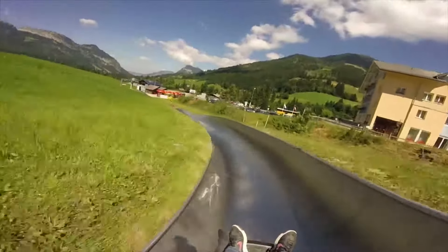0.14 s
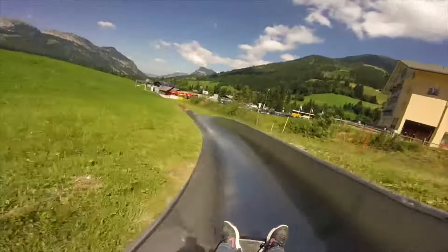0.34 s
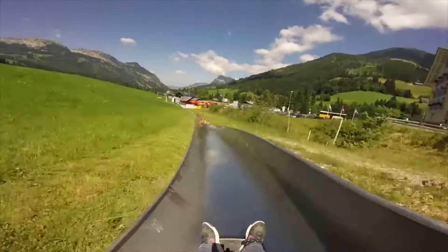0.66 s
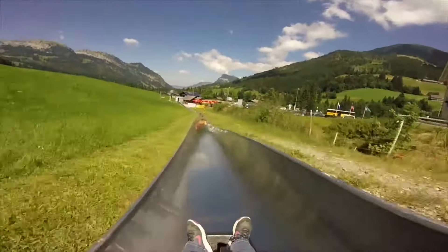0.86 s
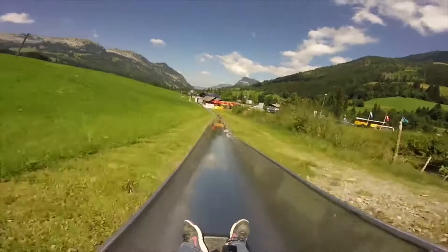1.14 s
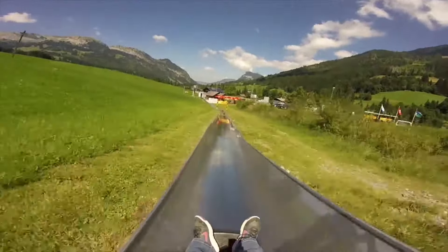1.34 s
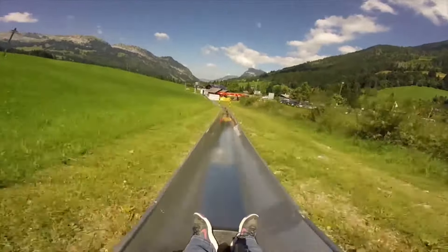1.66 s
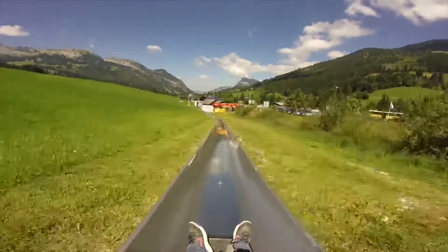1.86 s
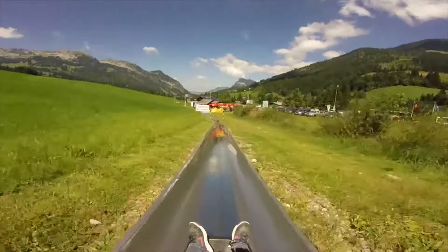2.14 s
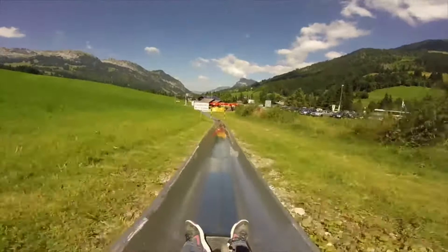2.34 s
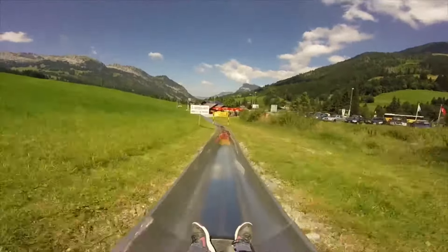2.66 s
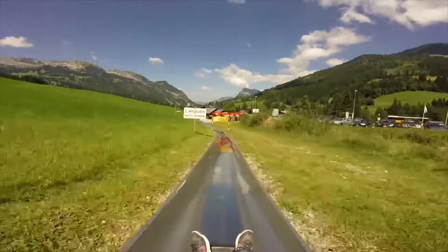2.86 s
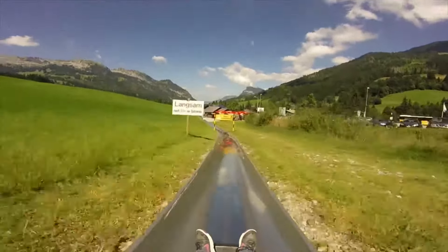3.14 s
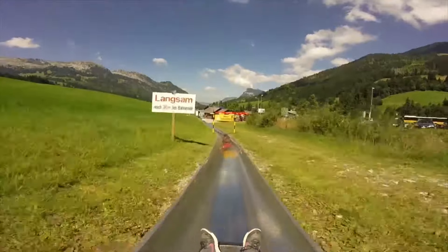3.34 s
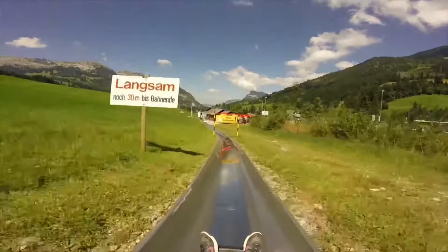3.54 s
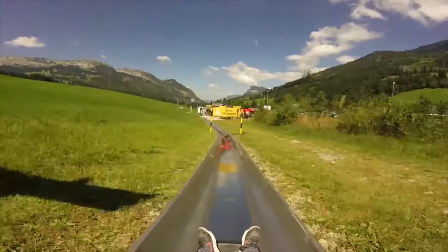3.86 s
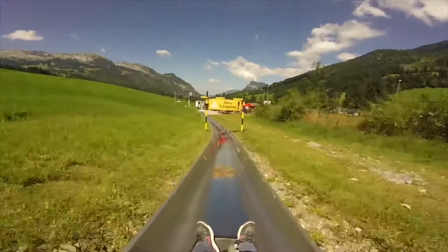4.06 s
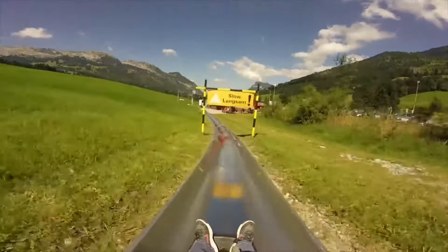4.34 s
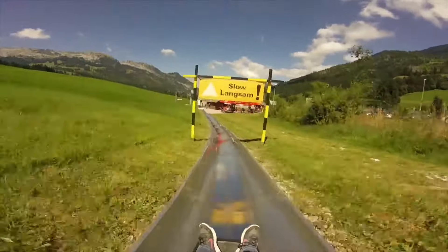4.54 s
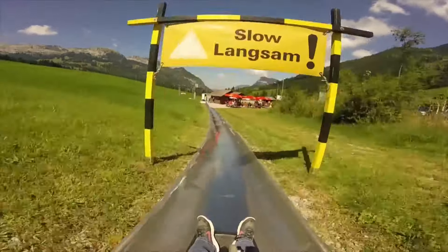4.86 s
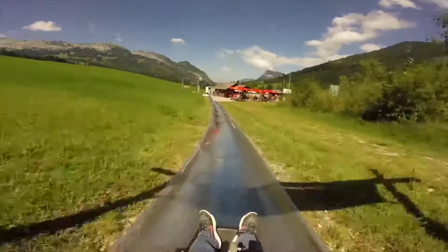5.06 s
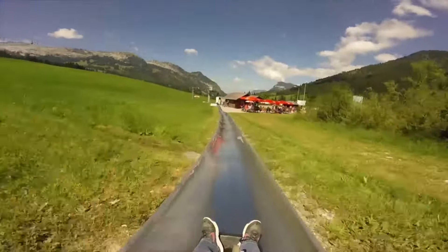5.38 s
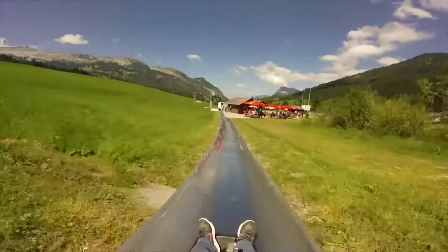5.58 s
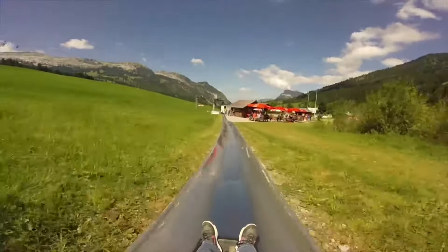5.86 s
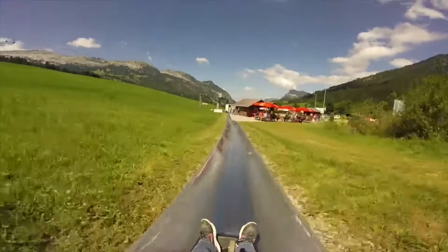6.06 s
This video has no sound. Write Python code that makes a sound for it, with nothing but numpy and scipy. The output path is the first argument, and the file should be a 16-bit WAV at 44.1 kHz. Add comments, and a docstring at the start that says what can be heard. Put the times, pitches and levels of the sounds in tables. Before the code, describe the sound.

A close, dry, mono ride on a wheeled sled in a steel trough outdoors. Low rough rumble, boomy buffeting and a thin grainy hiss run throughout, swelling with each shake. From 0 to 1.3 s knocks come thick and uneven, around 200 to 600 Hz, with jingling rattles, bright clinks, scrapes and a loose rod pinging near 2.5 kHz. A sharp, high clink marks 1.5 s; strong case thumps follow at 1.8 to 1.95 s. A hard knock lands at 2.2 s, then heavy ones at 2.5, 2.6 and 2.85 s while the trough flares in hollow rings until about 3.5 s. The bed then thins. Distinct jolts with short rattles and scrapes hit near 3.8, 4.15, 4.45, 4.8, 5.1 and 5.5 s. Faint chirps return from 4.3 s, clustering after a knock at 5.87 s, as rolling continues to the cut.

```python
"""Sled ride down a steel trough

On board a wheeled sled, with a cased microphone on the rider, close to wheels, frame and seat.
Shaped noise and sparse impacts make wind and shaking thump low, the wheels rumble and the trough ring hollow.
Struck resonances make joints knock, loose metal rattle and one rod ping; gritty slips scrape, chirp and clink.
"""
import sys
import numpy as np
from scipy import signal
from scipy.fft import rfft, irfft
from scipy.io import wavfile
from scipy.ndimage import uniform_filter1d

SR = 44100
rng = np.random.default_rng(int(sys.argv[2]) if len(sys.argv) > 2 else 0)


def materialize(psi):
    """Save the field psi as 16-bit PCM at rate SR to the path in sys.argv[1].

    A 1-D psi becomes a single channel; in a 2-D psi each row is a channel.
    """
    bounded = np.clip(np.atleast_2d(psi).T, -1, 1)
    quanta = np.round(bounded * 32767).astype(np.int16)
    wavfile.write(sys.argv[1], SR, quanta)


N = 274169

# steady layers before shaking lifts them: time_s, buffeting_db, rumble_db, hiss_db, chatter_db, trough_db
RIDE_LEVELS = [(0.0, -31, -35, -57, -53.5, -79), (0.25, -33.5, -37, -49.5, -58, -62),
               (0.63, -34, -38, -55.5, -63.5, -62), (1.01, -33.5, -35, -52.5, -61.5, -65),
               (1.49, -30, -36, -50.5, -55.5, -59), (1.82, -29.5, -35.5, -50.5, -61, -60.5),
               (2.13, -30, -33.5, -50, -61.5, -55), (2.3, -32, -39, -53.5, -68, -61),
               (2.87, -37, -42.5, -57.5, -68, -61.5), (3.14, -32, -38.5, -56.5, -64, -61),
               (3.35, -34.5, -40.5, -54.5, -71, -63), (3.5, -44, -41.5, -58, -63, -59.5),
               (3.65, -37.5, -44.5, -60.5, -72.5, -66.5), (4.09, -35.5, -40.5, -59.5, -71.5, -67.5),
               (4.33, -35, -41, -58.5, -69, -64.5), (4.78, -31, -38.5, -60, -69, -64.5),
               (5.01, -33, -36, -54.5, -69.5, -64), (5.28, -38, -39.5, -61, -68, -67),
               (5.67, -33, -36, -51, -67, -61.5), (5.84, -32, -40, -57.5, -62.5, -62),
               (6.09, -39.5, -43, -57.5, -69.5, -64), (6.22, -31, -38.5, -57, -67, -68)]
# deepest sway of the case: time_s, level_db
SWAY_LEVELS = [(0.0, -43), (0.26, -31), (0.66, -42.5), (0.9, -34), (0.94, -46), (1.14, -40), (3.44, -43),
               (3.48, -52), (4.88, -40.5), (4.95, -59), (5.06, -26.5), (5.16, -53), (5.73, -32.5),
               (5.82, -62), (6.08, -32), (6.22, -39)]
# spectra, relative level in each hertz: frequency_hz, level_db
SWAY_SPECTRUM = [(10, -20), (24, 11.5), (40, 6), (55, -3.5), (90, -66.5), (220, -150)]
BUFFET_SPECTRUM = [(20, -38), (45, -2.5), (92, 2), (250, -7.5), (320, -18.5), (550, -120)]
RUMBLE_SPECTRUM = [(59, -21), (100, -13.5), (224, -3.5), (417, -7), (511, -8), (828, -24), (1110, -74),
                   (1300, -34), (1690, -83), (2860, -120)]
HISS_SPECTRUM = [(470, -6.5), (800, 0), (1110, -7.5), (1710, -17), (2120, -10.5), (2770, -17), (3250, -11),
                 (3940, -24), (5000, -27.5), (6500, -31), (11000, -120)]
METAL_SPECTRUM = [(880, 7), (1500, 8.5), (2060, 5), (2420, 1), (2770, -12), (3130, 0.5), (3580, 2),
                  (4340, 2.5), (5010, -1), (6550, 2), (8240, -6), (12600, -22), (14800, -33)]
# hollow modes of the trough: frequency_hz, width_hz of each of two passes, level_db
TROUGH_MODES = [(1520, 56, 6), (1784, 240, 1.5), (1624, 480, 15)]
# taps on a rod more or less free to ring: start_s, level_db (peak of the main ring, before its buzz), t60_s
ROD_TAPS = [(0.002, -55, 0.38), (0.119, -46, .1), (0.132, -42.5, 0.055), (0.3064, -44, 0.24),
            (0.54, -59, .2), (0.703, -54, 0.24), (1.014, -46, .15), (1.064, -47, 0.19), (1.125, -55, .1),
            (1.174, -47, .12), (1.2285, -51, .3), (1.244, -48, 0.48), (1.591, -50.5, 0.18),
            (1.62, -48, 0.1), (1.833, -52.5, 0.44), (2.177, -58, .15)]
# short modes of the rod: frequency_hz, width_hz, level_db (peak, relative to the main ring)
ROD_CLINK_MODES = [(2330, 120, -11), (2660, 120, -20), (2900, 100, -1), (4470, 220, -6)]
# slips, rms level before the envelope: start_s, level_db, pitch_hz
PART_CLINKS = [(0.0044, -45, 6920), (0.006, -47, 6300), (0.008, -53, 5530), (0.035, -49, 6700),
               (0.0373, -55, 6450), (0.039, -59, 5400), (0.069, -48, 4220), (0.092, -56, 4150),
               (0.13, -54, 4720), (0.132, -55, 5450), (0.192, -51, 4400), (0.25, -56, 4720),
               (0.3755, -53, 6760), (0.7547, -59, 6800), (0.9264, -52, 6820), (1.009, -52, 4970),
               (1.063, -49, 4580), (1.174, -51, 4700), (1.176, -58, 4350), (1.234, -51, 4070),
               (1.31, -60, 5340), (1.345, -52, 5400), (1.3994, -50, 6260), (1.51, -33, 6800),
               (1.773, -59, 6540), (1.835, -56, 4800), (2.16, -60, 6500), (2.178, -59, 6600),
               (2.355, -61, 6940), (2.4688, -60, 6600), (3.0765, -53, 8200), (5.1876, -56, 6560),
               (5.8383, -52, 7170)]  # small steel parts on one clear pitch
BEARING_CHIRPS = [(0.008, -52, 3130), (0.185, -60, 3400), (0.05, -58, 3680), (0.465, -62, 3900),
                  (0.625, -52.5, 2890), (0.915, -51, 3150), (1.02, -53, 3000), (1.068, -45, 3170),
                  (1.078, -55, 4300), (1.104, -61, 3630), (4.278, -59, 3010), (4.462, -56, 3250),
                  (4.658, -60, 3130), (4.918, -54, 3050), (4.935, -55, 3050), (5.047, -60, 3120),
                  (5.5273, -62, 2960), (5.5744, -68, 3050), (5.854, -49, 3070), (5.881, -50.5, 3200),
                  (5.9369, -58, 3300), (5.963, -64, 3350), (5.9966, -56, 3240), (6.02, -58, 3200),
                  (6.071, -58, 3100), (6.172, -54.5, 3170), (6.2, -64, 3250)]  # brief chirps, perhaps a wheel bearing
STEEL_SCRAPES = [(0.068, -43.5, 1290), (0.093, -55, 1700), (0.1193, -51, 2470), (0.176, -53, 1290),
                 (0.2389, -52, 1540), (0.3042, -53, 2450), (0.4206, -50, 1730), (0.616, -49, 1970),
                 (0.852, -44.5, 1030), (0.872, -63, 1710), (0.992, -48, 1740), (1.013, -52, 2120),
                 (1.0652, -50, 2540), (1.1706, -54, 2380), (1.3159, -48, 1420), (1.331, -59, 1630),
                 (1.345, -55, 1500), (1.503, -57, 1560), (1.9989, -49.5, 1520), (2.0277, -44.5, 1210),
                 (2.097, -49, 1200), (2.2824, -51, 1300), (2.332, -59, 2420), (2.372, -52, 1570),
                 (2.475, -55, 1530), (2.5192, -50, 1360), (2.8389, -42, 945), (3.091, -48.5, 1650),
                 (3.218, -50, 1600), (3.289, -52, 1490), (3.48, -52, 1230), (3.8152, -38.5, 1200),
                 (3.826, -52, 1740), (3.865, -61, 1780), (3.9124, -57, 2160), (4.133, -60, 1100),
                 (4.461, -47, 1190), (4.568, -53.5, 1380), (4.7895, -48, 1510), (4.791, -35, 900),
                 (4.808, -60, 1700), (4.8928, -55, 2220), (5.042, -55, 1240), (5.249, -56, 1450),
                 (5.5, -48, 1440), (5.5925, -59, 1380), (5.6292, -50, 1350)]  # a runner or brake part on the steel
TROUGH_FLARES = [(2.41, -65, 1620), (2.525, -51, 1800), (2.535, -48, 1570), (2.585, -54, 1590),
                 (2.645, -51, 1520), (2.68, -57, 1680), (2.858, -48, 1520), (2.895, -55.5, 1530),
                 (2.985, -55, 1600), (3.088, -53, 1780), (3.18, -55, 1620), (3.24, -50, 1520),
                 (3.33, -65, 1540), (3.5, -63, 1610)]  # the hollow ring of the trough flares up
# bursts of loose parts: start_s, level_db (rms before envelope and stutter), t60_s, tilt_db_per_octave
RATTLE_BURSTS = [(0.0346, -50.5, 0.027, 6), (0.065, -49, 0.035, -11), (0.0955, -62, 0.15, -11),
                 (0.126, -48.5, 0.048, 13), (0.176, -51, 0.24, 9), (0.252, -52, 0.04, 11),
                 (0.288, -50.5, 0.17, 2), (0.312, -53, 0.055, 9), (0.373, -54, 0.048, 11),
                 (0.4247, -46, 0.33, -6.5), (0.461, -54.5, 0.1, 2.5), (0.492, -61.5, 0.12, 9),
                 (0.556, -65, 0.035, 12), (0.618, -49, 0.6, -7), (0.67, -58, 0.085, 10),
                 (0.696, -56, 0.31, -1), (0.752, -59, 0.035, 15), (0.807, -43.5, 0.18, -6.5),
                 (0.8452, -48.5, 0.34, 1), (0.923, -54, 0.033, 1), (0.99, -47.5, 0.25, -4.5),
                 (1.009, -54, 0.44, -3), (1.0586, -43.5, 0.19, -7.5), (1.151, -63, 0.17, 20),
                 (1.173, -54, 0.058, -1), (1.202, -55, 0.13, -8), (1.231, -58, 0.084, 6),
                 (1.305, -54, 0.18, 7), (1.33, -52, 0.073, 6), (1.3807, -45.5, 0.08, 13),
                 (1.396, -48, 0.064, 2), (1.422, -56, 0.066, 4), (1.458, -56, 0.065, 4),
                 (1.4984, -47, 0.42, 4), (1.6758, -56.5, 0.043, 15), (1.772, -66, 0.12, -6),
                 (1.789, -46.5, 0.082, -0.5), (1.837, -54, 0.15, -7), (1.944, -47.5, 0.55, -11),
                 (1.999, -58, 0.12, 3), (2.024, -65, 0.026, 10), (2.054, -68, 0.028, 10),
                 (2.161, -39, 0.11, -23), (2.1734, -48.5, 0.18, -8.5), (2.3057, -49.5, 0.33, -11),
                 (2.354, -69, 0.025, 10), (2.372, -53.5, 0.05, -0.5), (2.469, -67, 0.025, 6),
                 (2.489, -68, 0.024, 14), (2.5185, -44.5, 0.1, -1.5), (2.63, -54, 0.43, -3),
                 (2.8354, -46.5, 0.22, -2), (2.953, -51.5, 0.1, -6), (3.0657, -50, 0.16, 1),
                 (3.1598, -54, 0.31, -1.5), (3.211, -52, 0.32, -1), (3.291, -60.5, 0.082, 10),
                 (3.427, -52.5, 0.14, 6), (3.486, -48.5, 0.062, -4), (3.571, -55, 0.25, -2.5),
                 (3.812, -43, 0.089, -4), (3.9128, -53, 0.3, -8.5), (3.934, -54.5, 0.12, -12),
                 (3.958, -64, 0.03, 11), (4.131, -61, 0.11, -12), (4.1473, -44, 0.086, -3.5),
                 (4.202, -58.5, 0.21, -1.5), (4.246, -49.5, 0.18, -11.5), (4.352, -59, 0.076, -0.5),
                 (4.457, -43.5, 0.11, -5.5), (4.561, -55, 0.13, -3), (4.5768, -50.5, 0.39, -8),
                 (4.6502, -69, 0.055, 5), (4.763, -57.5, 0.089, 5), (4.787, -50, 0.083, 0),
                 (4.898, -52, 0.24, -6.5), (5.022, -59.5, 0.21, 2), (5.045, -50, 0.054, 2),
                 (5.0795, -64, 0.06, 3), (5.1347, -59.5, 0.089, 0), (5.186, -62, 0.083, 1),
                 (5.221, -69, 0.05, 8), (5.259, -48, 0.24, -7.5), (5.274, -65.5, 0.12, 14),
                 (5.298, -71, 0.074, 1), (5.419, -55, 0.059, 1), (5.437, -52.5, 0.058, -2),
                 (5.4985, -43.5, 0.074, -2.5), (5.484, -65, 0.04, 0), (5.5942, -66, 0.19, 2),
                 (5.6255, -47.5, 0.091, -5.5), (5.8383, -50, 0.052, 7), (5.852, -50, 0.072, 3),
                 (5.875, -53, 0.071, 1), (5.979, -53.5, 0.23, -3.5), (6.008, -52.5, 0.067, -3),
                 (6.047, -65, 0.06, -2), (6.1584, -68.5, 0.027, 13)]
# ringing parts in a rattle: frequency_hz, width_hz, level_db (centre of a small random spread)
PART_MODES = [(2905, 470, -8), (5200, 43, -40), (6280, 90, -23), (6790, 72, -22.5), (8200, 510, -20.5)]
# gusts and lurches that thump the case: start_s (centre of the thump), level_db (peak of the push)
CASE_THUMPS = [(0.055, -20), (0.261, -27.5), (0.327, -21), (0.359, -28), (0.396, -23), (0.427, -18),
               (0.688, -28), (0.892, -36), (1.041, -26), (1.258, -19.5), (1.309, -26), (1.376, -24),
               (1.555, -19.5), (1.688, -45), (1.732, -33), (1.828, -15.5), (1.943, -16.5), (2.043, -22),
               (2.176, -21), (2.478, -25), (2.526, -33), (2.64, -19), (3.297, -20), (3.403, -23.5),
               (3.475, -20), (3.59, -20), (3.913, -20.5), (4.037, -21.5), (4.142, -21), (4.526, -22),
               (4.791, -25), (4.895, -31), (5.047, -19.5), (5.137, -30), (5.254, -22.5), (5.428, -21.5),
               (5.519, -17.5), (5.605, -26), (5.694, -25.5), (6.004, -19), (6.109, -23)]
# wheels over joints and bumps: start_s, level_db (peak of the main ring), pitch_hz
WHEEL_KNOCKS = [(0.089, -29, 270), (0.058, -29, 517), (0.121, -22.5, 516), (0.132, -31, 550),
                (0.237, -26.5, 480), (0.262, -34, 593), (0.284, -48, 353), (0.312, -20, 504),
                (0.488, -20, 417), (0.507, -34, 557), (0.638, -29, 560), (0.663, -27, 365),
                (0.681, -18.5, 280), (0.806, -30, 266), (0.854, -19, 470), (0.893, -25, 355),
                (1.013, -33, 577), (1.061, -30.5, 431), (1.173, -24, 480), (1.207, -36, 560),
                (1.22, -26.5, 264), (1.318, -38, 434), (1.34, -25.5, 463), (1.369, -25.5, 417),
                (1.488, -24.5, 455), (1.529, -30, 278), (1.589, -23, 280), (1.665, -24, 307),
                (1.806, -24.5, 423), (1.831, -21, 403), (1.894, -32, 530), (1.958, -37, 520),
                (2.0, -22.5, 365), (2.121, -22, 272), (2.178, -17.5, 426), (2.189, -28, 444),
                (2.286, -30, 454), (2.515, -16, 460), (2.524, -26.5, 398), (2.629, -20, 450),
                (2.839, -17, 412), (2.852, -25.5, 445), (2.862, -37, 500), (3.154, -24.5, 465),
                (3.266, -24, 252), (3.342, -35, 300), (3.383, -32.5, 410), (3.423, -24.5, 270),
                (3.474, -25.5, 368), (3.486, -18, 394), (3.608, -31.5, 480), (3.805, -23, 350),
                (3.813, -18, 454), (3.934, -27, 460), (4.118, -47, 272), (4.136, -20, 430),
                (4.148, -16.5, 447), (4.268, -28, 445), (4.458, -23.5, 473), (4.466, -29.5, 450),
                (4.764, -33, 300), (4.782, -17, 380), (4.792, -23.5, 420), (4.812, -37, 325),
                (4.889, -30, 322), (4.903, -25.5, 290), (5.127, -16.5, 342), (5.192, -42, 300),
                (5.258, -27.5, 283), (5.484, -25, 487), (5.499, -21, 480), (5.51, -25, 432),
                (5.525, -32, 394), (5.591, -23.5, 450), (5.617, -33, 545), (5.864, -20.5, 252),
                (5.878, -17.5, 470), (6.014, -30, 280), (6.02, -22, 398)]
# upper modes of the frame: frequency_hz, half_width_hz of each of two passes, level_db (relative)
FRAME_MODES = [(780, 90, -31), (1130, 390, 20), (1530, 340, -7), (2030, 440, 5)]

RUN = 8192  # samples in one short event, about 0.19 s
SHAKE_RISE_S, SHAKE_FALL_S = 0.0078, 0.022  # time constants around each knock
SHAKE_DRIVE_DB = -22.5  # a lone knock of this level shakes to 0.76 of the limit
# lift of each layer at the limit of shaking
SHAKE_RUMBLE_DB, SHAKE_HISS_DB, SHAKE_CHATTER_DB, SHAKE_TROUGH_DB = 6, 5, 6, 6
SWELL_HALF_S, SWELL_DB = 0.037, -15.5  # buffeting swell around a thump, relative to its push
ROD_HZ = 2489
FIRST_CATCH = 1.75  # size of a slip's first catch; later ones start at 1
SOFT_SLIP_DB, HARD_SLIP_DB, HARD_SLIP_SHARE = -49, -35.5, 0.28  # a hard slip keeps this share of its t60
CLINK_T60_S, CHIRP_T60_S, SCRAPE_T60_S, FLARE_T60_S = 0.067, 0.073, 0.18, 0.21  # for soft slips
RATTLE_LOW_HZ, RATTLE_HIGH_HZ = 3010, 5610  # three rings are drawn in this range for each burst
WEAK_DB, WEAK_RISE_MS, STRONG_DB, STRONG_RISE_MS = -60.5, 7.3, -44, 1.1  # strong bursts start sharply
FIRST_TICK_DB = 9.5  # first impact of a rattle, over the weakest later ones
PUSH_S, REBOUND_S = 0.0021, 0.0046  # half widths of the push and of the rebound around it
KNOCK_T60_S, KNOCK_WIDTH_HZ, UPPER_DB = 0.06, 270, -24
WEAK_FIRST_BLOW, STRONG_FIRST_BLOW = 4.3, 6.1  # size at -30 and -18 dB; later bounces start at 1
BOOM_HZ, BOOM_WIDTH_HZ, BOOM_DB = 197.3, 81, -10.5
SHEET_HZ, SHEET_DB, SHEET_LAG_S = 1580, -40.5, 0.008
EDGE_HZ = 14950


def gain_of(db):
    """Amplitude ratio of a level in decibels."""
    return 10 ** (np.asarray(db) / 20)


def evened(x):
    """Scales x to an rms of 1."""
    return x / np.sqrt(np.mean(x ** 2) + 1e-20)


def peaked(x):
    """Scales x to a peak of 1."""
    return x / abs(x).max()


def read(points, hz):
    """Reads a spectrum between its points on a log frequency scale."""
    f, value = np.transpose(points)
    return np.interp(np.log(hz + 1), np.log(f + 1), value)


def add(mix, s, sound):
    """Lays a sound into the mix from s seconds, cut at the end."""
    part = mix[round(s * SR):][:len(sound)]
    part += sound[:len(part)]


def resonate(x, hz, width):
    """A two-pole resonance of gain 1 at its centre."""
    return signal.lfilter(*signal.iirpeak(hz, max(hz / width, .5), SR), x)


def resonate_twice(x, hz, width):
    """Two equal resonances in a row, for a rounder onset and steeper skirts."""
    return resonate(resonate(x, hz, width), hz, width)


def colour(x, points, tilt_db=0):
    """Shapes x by a spectrum, tilted about 5 kHz by roughly tilt_db an octave."""
    hz = np.fft.rfftfreq(len(x), 1 / SR)
    octaves = np.log2((np.minimum(hz, 9000) + 500) / 5500)  # the tilt stops at 9 kHz
    gain = gain_of(read(points, hz) + tilt_db * octaves)
    return evened(irfft(rfft(x) * gain, len(x)))


def lumps(ms, depth_db):
    """Random level swings that last about ms, with an rms of depth_db."""
    size = max(int(ms * SR / 1000), 2)
    smooth = uniform_filter1d(uniform_filter1d(rng.standard_normal(N), size), size)
    return gain_of(depth_db * evened(smooth))


def strikes(size, per_s, spread_db):
    """Sparse impacts of random sign; a few are large."""
    chance, sign, strength = rng.random((size, 3)).T
    level_db = spread_db * np.minimum(-np.log(strength + 1e-9), 4)
    return (chance < per_s / SR) * np.sign(sign - .5) * gain_of(level_db)


def blow(t60, rise_ms, size):
    """Envelope of a jolt: quick rise, exponential fall."""
    t = np.arange(size) / SR
    rise = (1 - np.exp(-t * 1000 / max(rise_ms, .2))) ** 2
    return peaked(rise * gain_of(-60 * t / max(t60, .02)))


def shake():
    """How hard the sled shakes: surges around the knocks, limited below 1."""
    t = np.arange(N) / SR
    swells = [gain_of(db - SHAKE_DRIVE_DB) * np.exp(-np.maximum((s - t) / SHAKE_RISE_S, (t - s) / SHAKE_FALL_S))
              for s, db, hz in WHEEL_KNOCKS]
    return np.tanh(sum(swells))


def ride(column, shake_db=0):
    """One column of the ride as a gain for each sample, lifted while the sled shakes."""
    rows = np.transpose(RIDE_LEVELS)
    level_db = np.interp(np.arange(N) / SR, rows[0], rows[column])
    return gain_of(level_db + shake_db * shake())


def sway():
    """The deepest movement of the case: low noise whose level follows a table."""
    level_db = np.interp(np.arange(N) / SR, *np.transpose(SWAY_LEVELS))
    return colour(rng.standard_normal(N), SWAY_SPECTRUM) * gain_of(level_db)


def thump_swells():
    """Gain of the buffeting that swells around each thump."""
    t = np.arange(N) / SR
    return sum(gain_of(db + SWELL_DB) * np.exp(-((t - s) / SWELL_HALF_S) ** 2) for s, db in CASE_THUMPS)


def buffeting(surge):
    """Wind and shaking beat on the case: low impacts in lumps, stronger around thumps."""
    buffet = evened(colour(strikes(N, 300, 0.74), BUFFET_SPECTRUM) * surge * lumps(29, 0.96))
    return buffet * np.hypot(ride(column=1), thump_swells())


def rumble(surge):
    """Rough wheel contact through the frame: dense low impacts in uneven lumps."""
    contact = evened(colour(strikes(N, 600, 0.57), RUMBLE_SPECTRUM) * surge * lumps(19, 0.97))
    return contact * ride(column=2, shake_db=SHAKE_RUMBLE_DB)


def hiss():
    """The fine grain of rolling: very dense impacts in quick lumps."""
    grain = evened(colour(strikes(N, 4000, 0.98), HISS_SPECTRUM) * lumps(3.3, 1.0))
    return grain * ride(column=3, shake_db=SHAKE_HISS_DB)


def rolling():
    """Buffeting, rumble, hiss and sway; buffeting and rumble share one slow surge."""
    surge = lumps(37, 0.81)
    return buffeting(surge) + rumble(surge) + hiss() + sway()


def trough():
    """The curved steel sheet rings hollow under the wheels: lumpy contact excites its modes."""
    contact = strikes(N, 1500, 2.1) * lumps(30, 2.8)
    ring = sum(gain_of(db) * resonate_twice(contact, hz, width) for hz, width, db in TROUGH_MODES)
    return evened(ring) * ride(column=5, shake_db=SHAKE_TROUGH_DB)


def chatter():
    """Loose parts tick all the time, in clumps of metal-coloured impacts."""
    ticks = strikes(N, 3000, 2.4) * lumps(12, 2.4)
    return colour(ticks, METAL_SPECTRUM, -1.3) * ride(column=4, shake_db=SHAKE_CHATTER_DB)


def pings():
    """A flurry of taps sets the rod ringing on one narrow mode, with short clinks around it."""
    out = np.zeros(N)
    for s, db, t60 in ROD_TAPS:
        taps = strikes(size=16384, per_s=700, spread_db=2.5) * blow(0.08, 1.3, size=16384)
        taps[20] = 3.4  # the first firm tap
        ring = resonate(taps, ROD_HZ, np.log(1000) / np.pi / t60)  # bandwidth that decays 60 dB in t60
        clinking = sum(gain_of(g) * peaked(resonate(taps, hz, width)) for hz, width, g in ROD_CLINK_MODES)
        add(out, s, gain_of(db) * (peaked(ring) + clinking))
    return out * lumps(5, 1.8)  # the loose rod buzzes as it rings


def slips(table, t60, width, per_s):
    """Gritty slips: a run of tiny catches through one resonance; hard slips die sooner."""
    out = np.zeros(N)
    for s, db, hz in table:
        catches = strikes(size=RUN, per_s=per_s, spread_db=1.5)
        catches[40] = FIRST_CATCH
        grit = evened(resonate_twice(catches, hz, width))
        share = np.interp(db, [SOFT_SLIP_DB, HARD_SLIP_DB], [1, HARD_SLIP_SHARE])
        add(out, s, gain_of(db) * grit * blow(t60 * share, 0.28, size=RUN))
    return out


def clinks():
    """Small steel parts clink: short slips through a narrow resonance."""
    return slips(PART_CLINKS, CLINK_T60_S, width=100, per_s=1400)


def chirps():
    """Brief chirps, perhaps a wheel bearing: short slips on one pitch."""
    return slips(BEARING_CHIRPS, CHIRP_T60_S, width=140, per_s=2100)


def jingle(x, tilt_db, ring_hz):
    """Colours impacts like small steel parts: a wide clatter plus short rings, unevenly struck."""
    wide = colour(x, METAL_SPECTRUM, tilt_db)
    rings = sum(gain_of(db + 1.1 * rng.standard_normal()) * evened(resonate(wide, hz, width))
                for hz, width, db in PART_MODES)
    drawn_rings = sum(gain_of(-18) * evened(resonate(wide, hz, 220)) for hz in ring_hz)
    return evened(wide + rings + drawn_rings)


def rattles():
    """Each burst is a run of tiny metal impacts that swells, stutters and dies away."""
    out = np.zeros(N)
    for s, db, t60, tilt_db in RATTLE_BURSTS:
        ring_hz = rng.uniform(RATTLE_LOW_HZ, RATTLE_HIGH_HZ, size=3)
        rise_ms = np.interp(db, [WEAK_DB, STRONG_DB], [WEAK_RISE_MS, STRONG_RISE_MS])
        ticks = strikes(size=RUN, per_s=3000, spread_db=1.0)
        ticks[round(rise_ms * SR / 1000)] = gain_of(FIRST_TICK_DB)
        add(out, s, gain_of(db) * jingle(ticks, tilt_db, ring_hz) * blow(t60, rise_ms, size=RUN))
    return out * lumps(4, 2.5)


def pushes():
    """Each thump is one round push, in or out, inside a wider and shallower rebound."""
    t, out = np.arange(-1024, 1024) / SR, np.zeros(N)
    rebound = PUSH_S / REBOUND_S * np.exp(-(t / REBOUND_S) ** 2)  # of equal area, so the pair sums to zero
    push = np.exp(-(t / PUSH_S) ** 2) - rebound
    for s, db in CASE_THUMPS:
        add(out, s + t[0], rng.choice([-1, 1]) * gain_of(db) * push / push.max())
    return out


def knocks():
    """Each jolt is one firm blow and weaker bounces that ring frame, seat and trough."""
    out = np.zeros(N)
    for s, db, hz in WHEEL_KNOCKS:
        bounces = strikes(size=RUN, per_s=900, spread_db=2.5) * blow(KNOCK_T60_S, 2.3, size=RUN)
        bounces[60] = np.interp(db, [-30, -18], [WEAK_FIRST_BLOW, STRONG_FIRST_BLOW])
        contacts = np.convolve(bounces, np.hanning(60))  # a tyre spreads each contact over about a millisecond
        body = resonate_twice(contacts, hz, KNOCK_WIDTH_HZ)[:RUN]
        upper = sum(gain_of(g) * resonate_twice(bounces, f, 2 * half) for f, half, g in FRAME_MODES)
        # the seat booms under each knock
        boom = resonate_twice(contacts, BOOM_HZ, BOOM_WIDTH_HZ)[:RUN]
        # the trough rings on just after, at a slightly different pitch each time
        sheet_hz = SHEET_HZ * (1 + 0.036 * rng.standard_normal())
        sheet = resonate(resonate(bounces, sheet_hz, 45), SHEET_HZ, 300)
        add(out, s + SHEET_LAG_S, gain_of(db + SHEET_DB) * peaked(sheet))
        add(out, s, gain_of(db + BOOM_DB) * peaked(boom))
        add(out, s, gain_of(db) * (peaked(body) + gain_of(UPPER_DB) * peaked(upper)))
    return out


def scrapes():
    """A runner or brake part scrapes the steel: slips through a wide resonance."""
    return slips(STEEL_SCRAPES, SCRAPE_T60_S, width=690, per_s=1800)


def flares():
    """The hollow ring of the trough flares up: longer slips through a narrow resonance."""
    return slips(TROUGH_FLARES, FLARE_T60_S, width=120, per_s=1800)


def scene():
    """Sums the steady ride, the jolts and the gritty slips into one channel."""
    steady = rolling() + trough() + chatter()
    jolts = pushes() + knocks() + rattles() + pings()
    grit = scrapes() + chirps() + clinks() + flares()
    return (steady + jolts + grit)[None]


def record(dry):
    """The microphone channel: a steep low-pass limits the treble."""
    low_pass = signal.firwin(511, EDGE_HZ, window=("kaiser", 9), fs=SR)
    return signal.oaconvolve(dry, low_pass[None], "same")


dry = scene()
out = record(dry)
materialize(out)
```